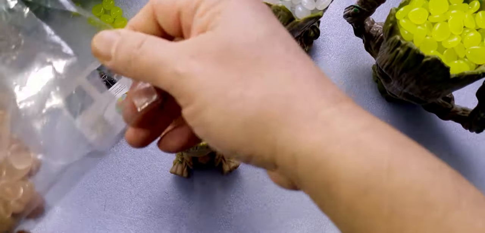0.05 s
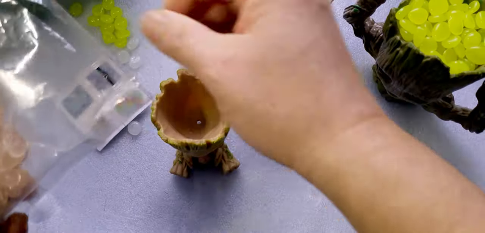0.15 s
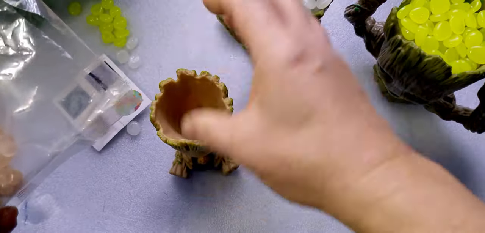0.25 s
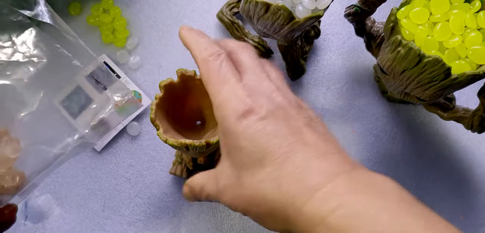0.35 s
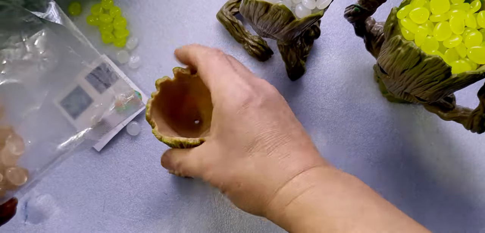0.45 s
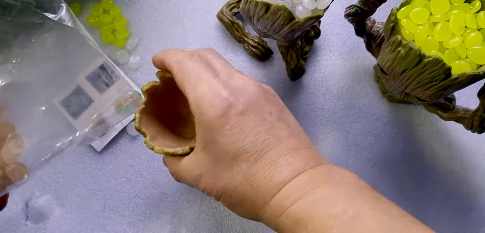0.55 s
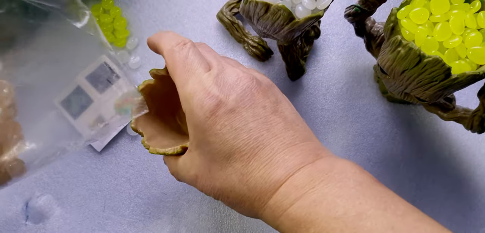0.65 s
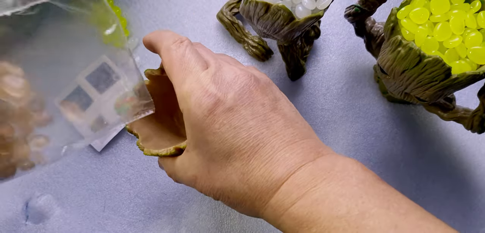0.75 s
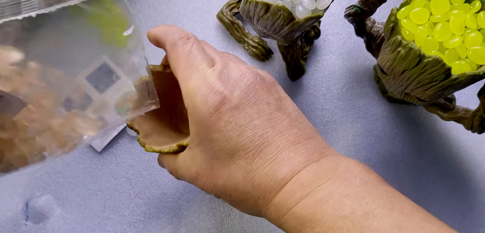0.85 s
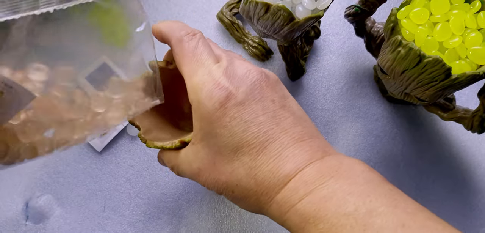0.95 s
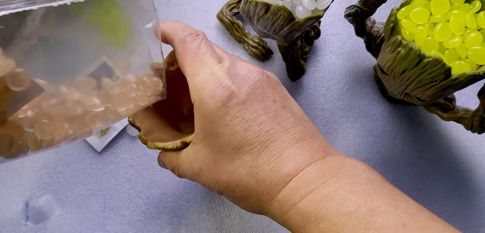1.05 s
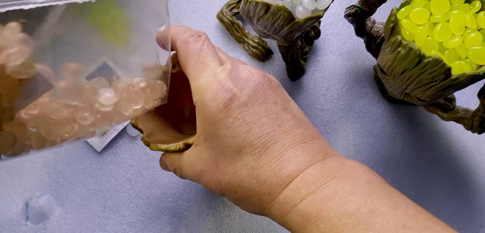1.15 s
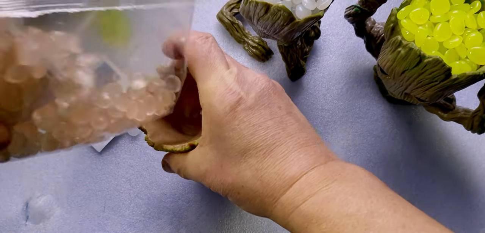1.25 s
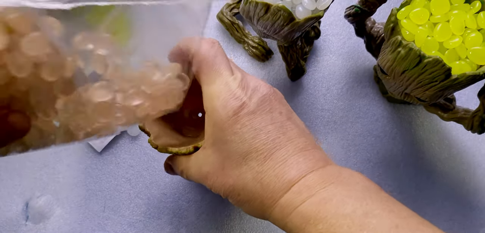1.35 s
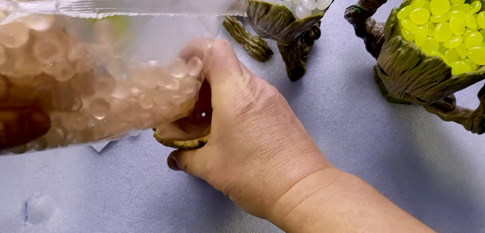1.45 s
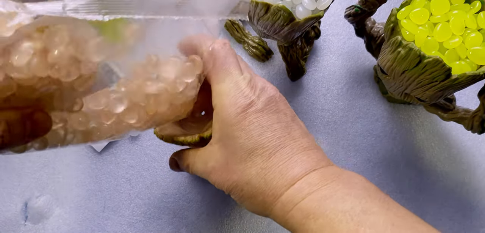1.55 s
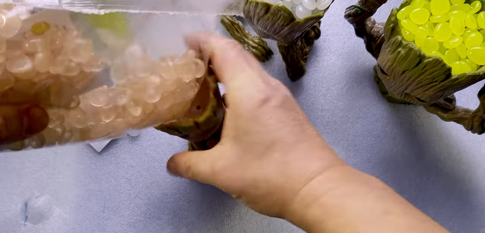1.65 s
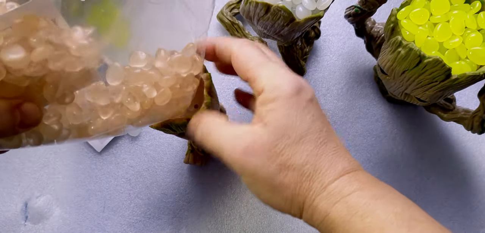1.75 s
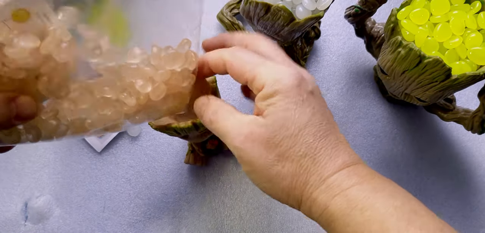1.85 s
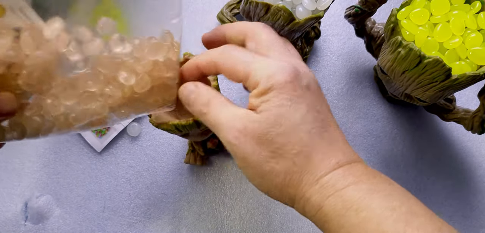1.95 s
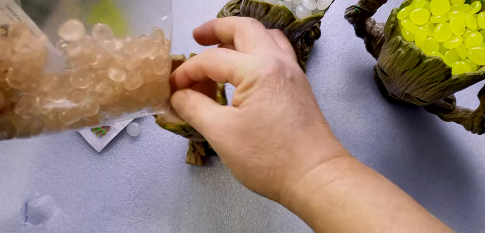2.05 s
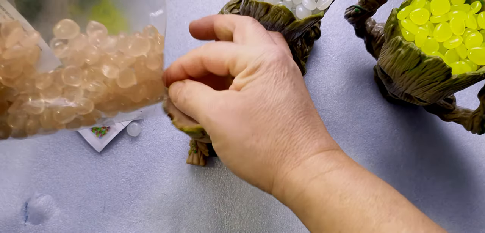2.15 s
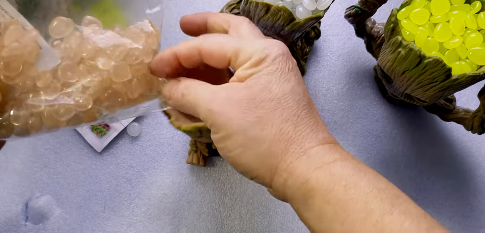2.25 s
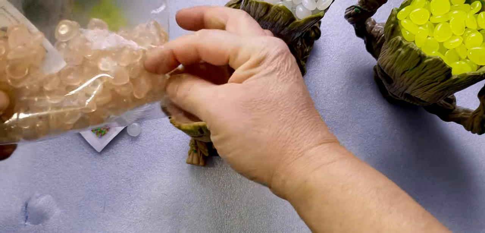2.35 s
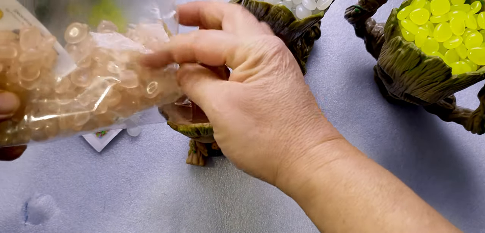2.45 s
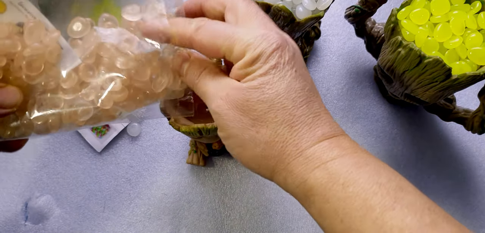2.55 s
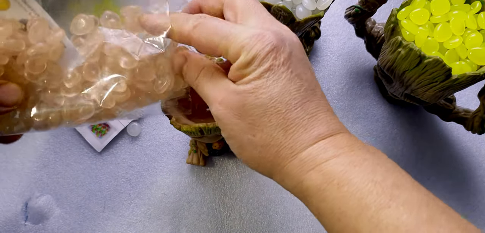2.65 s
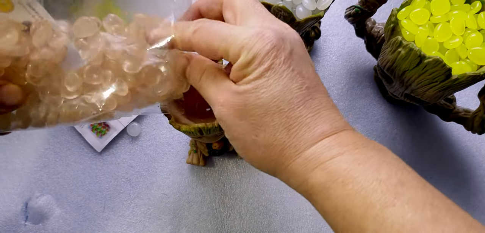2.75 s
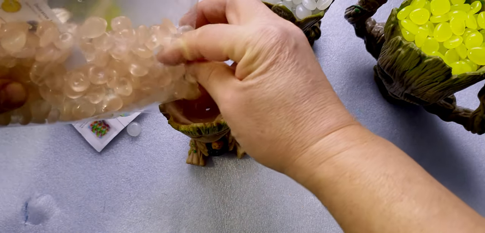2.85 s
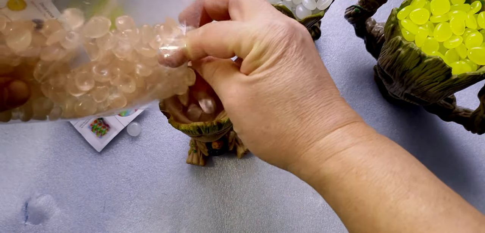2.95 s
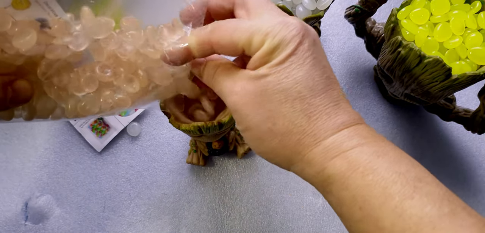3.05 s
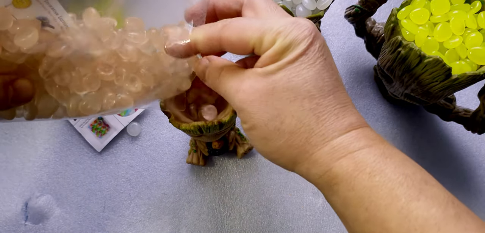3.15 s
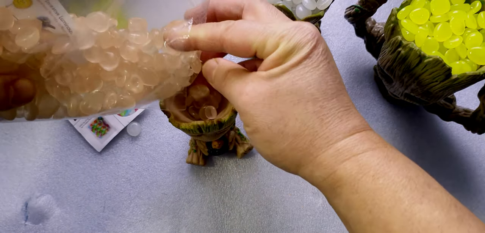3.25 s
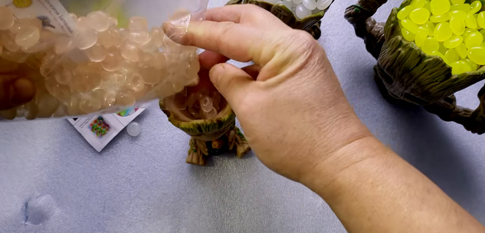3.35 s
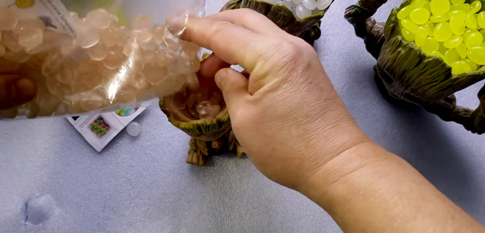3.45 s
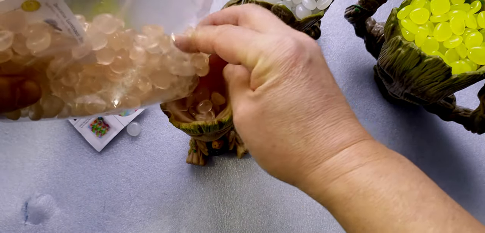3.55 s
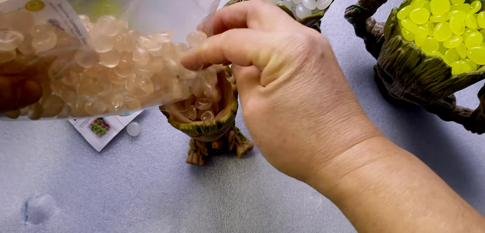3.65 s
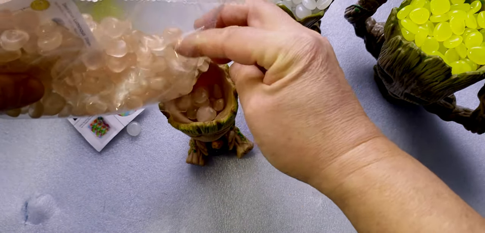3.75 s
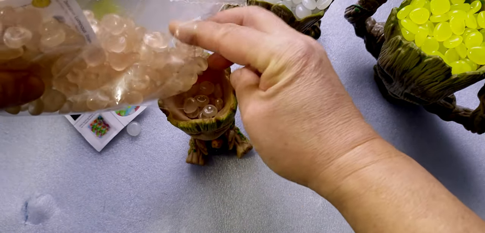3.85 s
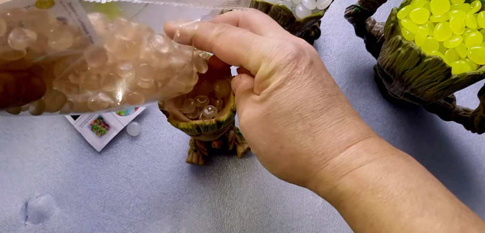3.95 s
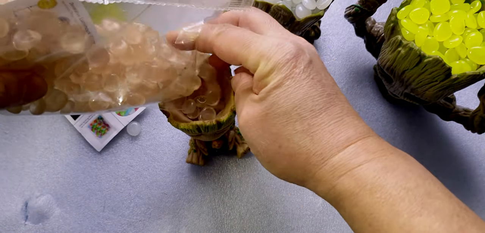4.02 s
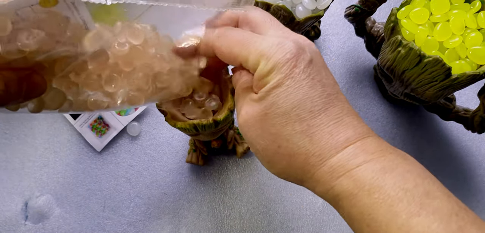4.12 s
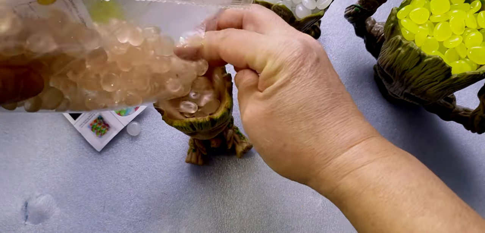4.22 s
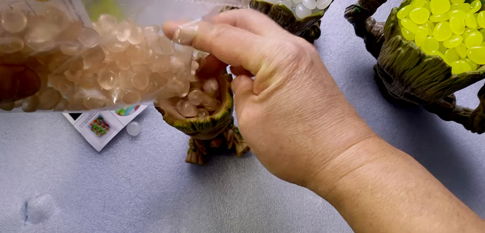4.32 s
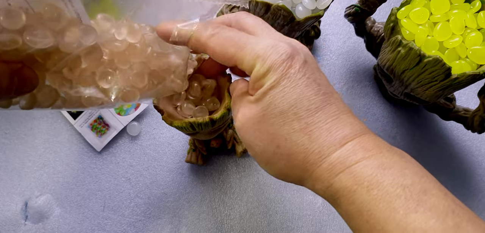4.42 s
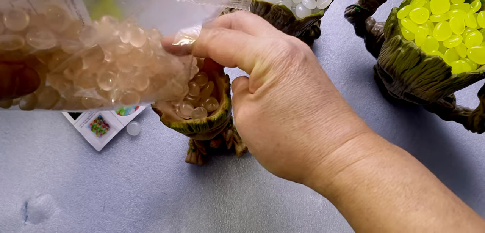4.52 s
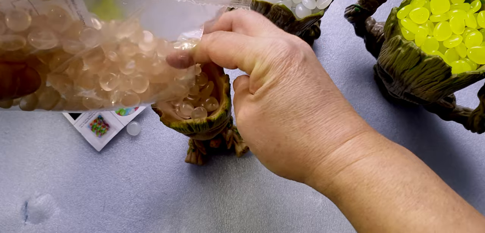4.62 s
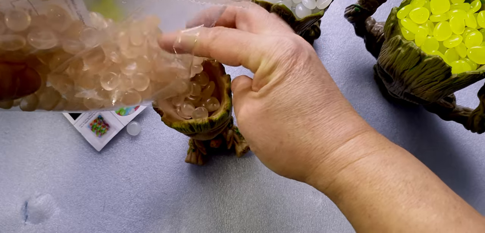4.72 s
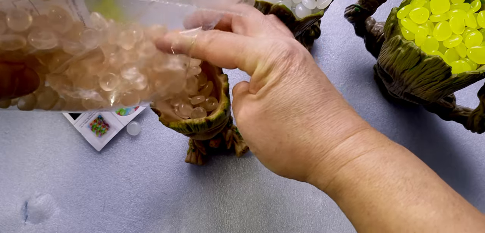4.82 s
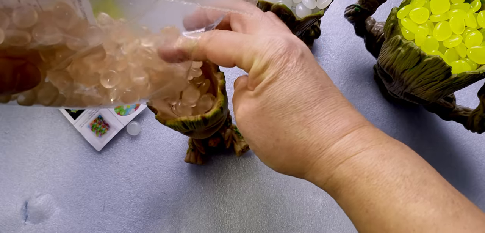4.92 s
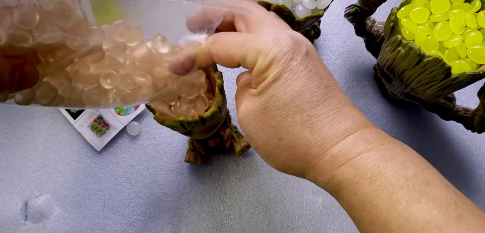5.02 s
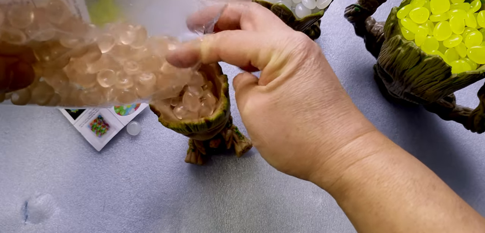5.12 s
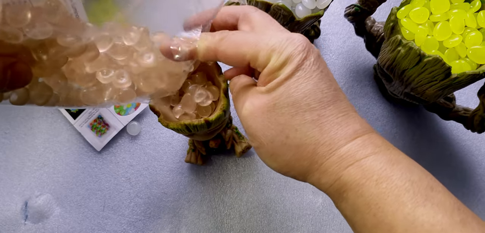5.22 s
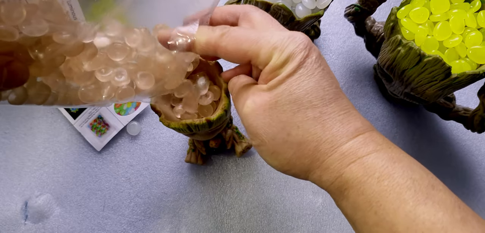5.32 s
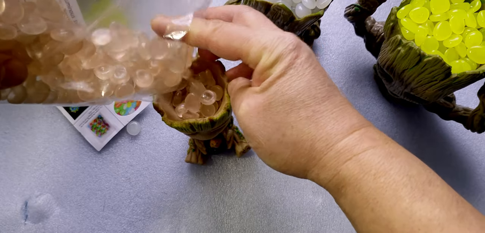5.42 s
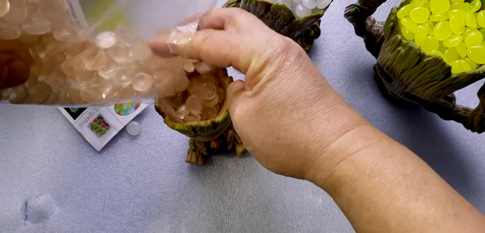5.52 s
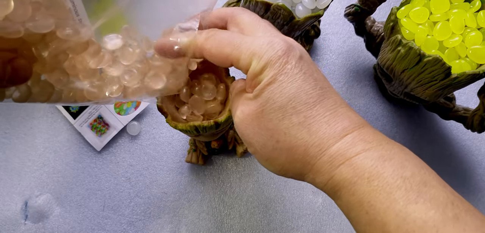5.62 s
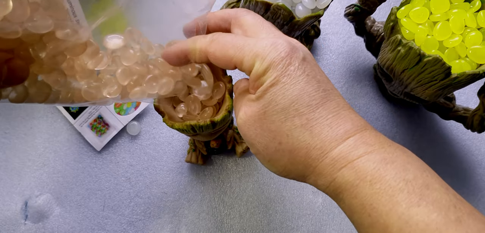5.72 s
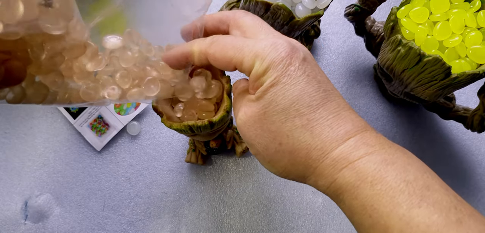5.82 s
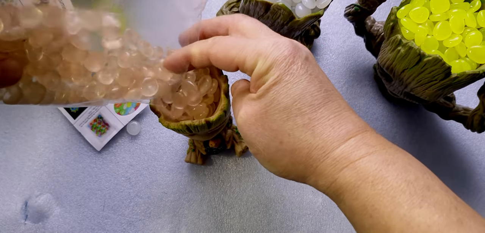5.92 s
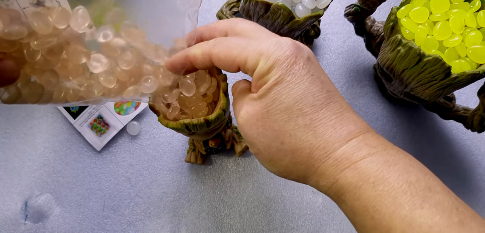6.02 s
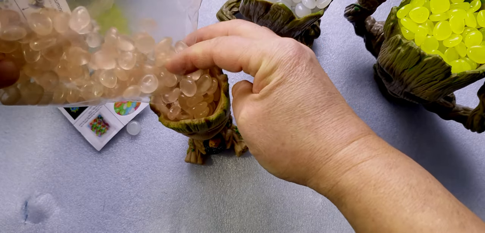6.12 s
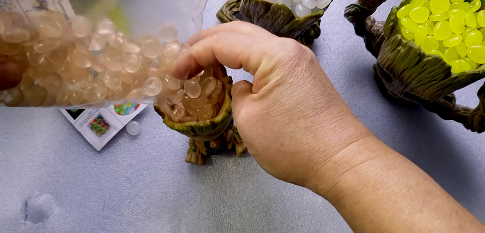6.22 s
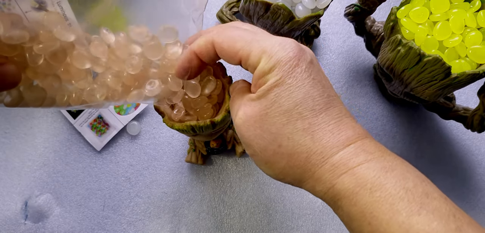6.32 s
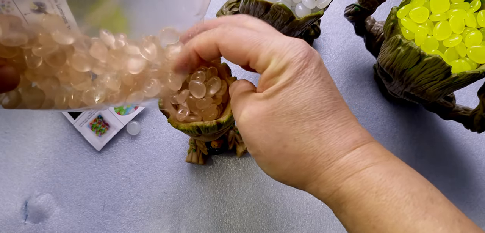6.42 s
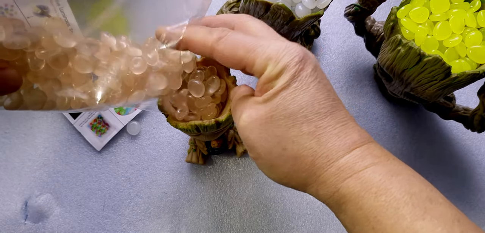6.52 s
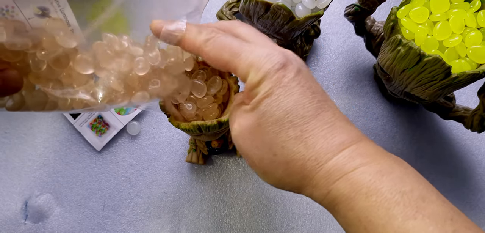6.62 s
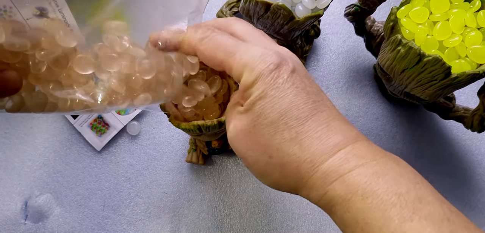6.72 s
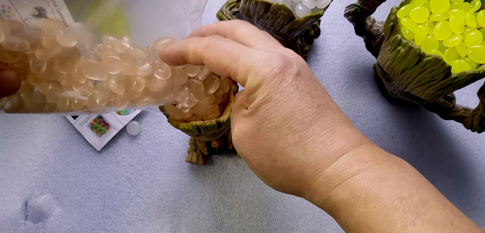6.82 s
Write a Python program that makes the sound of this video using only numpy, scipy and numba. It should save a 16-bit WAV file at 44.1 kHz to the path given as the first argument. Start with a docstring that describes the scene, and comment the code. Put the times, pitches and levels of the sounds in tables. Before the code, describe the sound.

A light crinkle and a dull thud come first. Then smooth pebbles slide inside a thin plastic bag and drop into a small pot in uneven spurts, clacking and clinking against each other. The heap shifts with dull thuds while the plastic snaps in bright crinkles. The pour thins to scattered clicks under sharp crackling, then picks up near the end. The stereo microphone is close, in a small, quiet room.

```python
"""A light crinkle and a dull thud, then smooth pebbles slide in a thin plastic bag and drop into a small pot.
The heap lurches and thuds, pebbles clack on each other and the pot, the film snaps in bright crinkles.
Each hit is a cloud of short damped grains. The pot and the desk under it ring, and the desk takes a few
low bumps. The stereo microphone is close; a small, quiet room adds a brief tail."""
import sys
import numpy as np
from scipy import signal
from scipy.fft import rfft, irfft
from scipy.io import wavfile
from numba import njit

SR = 44100
rng = np.random.default_rng(int(sys.argv[2]) if len(sys.argv) > 2 else 0)


def wav_record(signal):
    """Record a signal, one row per channel, as 16-bit PCM in the file named by sys.argv[1]."""
    frames = np.transpose(np.atleast_2d(signal))
    bounded = np.clip(frames, -1, 1)
    # unit amplitude maps onto the largest positive 16-bit level
    quanta = np.round(bounded * 32767).astype(np.int16)
    wavfile.write(sys.argv[1], SR, quanta)


N = 302967

# the heap lurches: t/s, level/dB, f/Hz, following slide/dB below level
LURCHES = [(0.12, -32, 400, 0.5), (0.1468, -11.5, 345, 38), (0.695, -21, 520, 26), (0.8005, -12.5, 440, 16),
           (0.816, -21, 390, 20), (0.898, -14.5, 455, 10), (0.92, -24, 350, 14), (0.95, -16, 407, 20),
           (0.992, -21, 480, 7), (1.05, -17.5, 330, 20), (1.097, -13.5, 410, 22), (1.132, -31, 395, 24),
           (1.227, -22, 350, 11), (1.302, -14, 294, 17), (1.332, -10, 480, 15), (1.412, -15.5, 490, 10),
           (1.512, -9, 340, 25), (1.552, -11, 460, 15), (1.6164, -11.5, 400, 12), (1.678, -17, 480, 15),
           (1.7125, -11.5, 408, 12), (1.847, -14.5, 306, 7), (1.866, -4.5, 395, 17.5), (1.955, -24, 333, 7),
           (2.015, -22, 410, 6), (2.038, -15.5, 403, 30), (2.098, -25.5, 268, 10), (2.33, -30, 302, 12),
           (2.433, -29, 304, 13), (2.47, -16, 480, 17), (2.533, -24, 410, 7), (2.645, -10, 500, 19),
           (3.076, -22, 480, 27), (3.2205, -10, 510, 28), (3.339, -26, 416, 24), (3.404, -26, 500, 20),
           (3.452, -26.5, 393, 8), (3.937, -24.5, 410, 17), (3.976, -21.5, 292, 19), (4.017, -29, 320, 21),
           (4.149, -26.5, 328, 12), (4.227, -20, 473, 23), (4.43, -32, 433, 9), (4.5885, -15.5, 354, 29),
           (4.627, -19, 378, 20), (5.03, -29, 448, 6), (5.075, -23.5, 450, 14), (5.261, -21, 377, 20),
           (5.295, -24, 400, 12), (5.421, -20.5, 287, 11.5), (5.464, -28.5, 400, 4.5),
           (5.767, -26, 580, 19), (5.869, -22, 269, 21), (5.926, -23, 519, 6), (6.027, -25, 240, 9),
           (6.24, -25, 486, 11), (6.31, -17.5, 493, 11), (6.405, -37, 330, 23), (6.4821, -10, 710, 31),
           (6.571, -18.5, 229, 11), (6.617, -16.5, 337, 16), (6.723, -27, 396, 14), (6.755, -18, 635, 20),
           (6.811, -12, 520, 22)]
# pebbles land: t/s, level/dB, f/Hz, pan/dB (left minus right), following tumble/dB below level
LANDINGS = [(0.0937, -26, 4600, 22, 18), (0.1437, -18, 1230, -1, 12.5), (0.469, -35, 4230, 23, 33),
            (0.4995, -21.5, 1110, 13, 17.5), (0.712, -23.5, 1640, 11, 12.5), (0.8028, -13.5, 1530, 8, 11.5),
            (0.855, -20, 720, 17, 23), (0.893, -1.5, 1670, 7, 19.5), (1.039, -13, 2790, 8, 23),
            (1.061, -26, 940, 7, 24), (1.294, -25.5, 1800, 0.5, 1), (1.311, -18, 1760, 2, 8),
            (1.345, -11.5, 1630, 5, 12.5), (1.371, -11.5, 2000, -1, 16), (1.447, -18.5, 950, 1, 6.5),
            (1.484, -8, 2010, -4, 19), (1.517, -11, 696, 6, 28), (1.617, -10.5, 745, 1.0, 16),
            (1.656, -3.5, 1900, 2, 25), (1.729, -7, 1080, -4, 19.5), (1.841, -23.5, 840, 2, 6),
            (1.863, -10, 690, 2, 15), (1.998, -15, 1640, 6, 29), (2.022, -7, 2090, 5, 25),
            (2.14, -14, 2470, 5, 28), (2.328, -18, 1780, 18, 13), (2.436, -14, 2200, 2.5, 29),
            (2.469, -11.5, 2140, 9, 15.5), (2.511, -15.5, 2340, 3, 20), (2.556, -12.5, 1620, -1, 24),
            (2.621, -13, 1950, 2.5, 30), (2.64, -8.5, 730, 9, 28), (2.654, -14, 2000, 1, 31),
            (2.683, -8.5, 1080, 8, 28), (2.761, -18.5, 1100, 0.5, 23), (2.797, -8.5, 1530, 2, 23),
            (2.969, -16.5, 1760, -1, 30), (3.038, -16, 1160, 8, 34), (3.078, -16, 920, 1.5, 18),
            (3.2235, -2.5, 2380, 3, 20.5), (3.2312, -14.5, 2430, 16, 26), (3.323, -17.5, 2080, 3, 30),
            (3.407, -22.5, 1020, 2, 12), (3.476, -12, 2390, 1.5, 19.5), (3.636, -20.5, 990, 2, 16),
            (3.862, -15.5, 785, -5, 11), (3.91, -12.5, 2700, -3, 35), (3.9403, -11, 1450, -1, 32),
            (4.008, -23, 2010, -3, 8), (4.321, -18.5, 2920, -8, 15), (4.434, -27, 3440, 6, 23),
            (4.455, -18, 1310, 1.0, 19), (4.511, -9.5, 2490, -2, 41), (4.538, -12, 2540, -1, 43),
            (4.892, -19.5, 2390, -1, 25), (5.007, -18, 3300, 9, 13), (5.462, -18.5, 1020, 0, 11),
            (5.714, -23, 2100, 1.5, 29), (5.77, -18, 650, 2, 24), (5.828, -18, 1760, 0, 15.5),
            (5.899, -19, 2370, 0, 7), (5.928, -19.5, 836, 7, 6.5), (5.965, -15, 960, 9, 13.5),
            (6.244, -18.5, 760, 0, 31), (6.405, -17.5, 705, 2, 33), (6.447, -20.5, 955, 2.5, 25),
            (6.4849, -6.5, 1310, 3, 17), (6.4898, -11, 2080, -6, 26), (6.5069, -9, 3380, 2.0, 31),
            (6.5754, -9.5, 2500, 1, 19), (6.61, -16, 970, -2, 13), (6.663, -11, 936, 3, 17.5),
            (6.685, -11, 1120, 1.0, 31), (6.757, -13, 1080, 7, 15)]
# the film snaps: t/s, level/dB, lower treble/dB re level, pan/dB, following rustle/dB below level
FILM_SNAPS = [(0.0923, -30.5, -1.5, 10, 17), (0.1106, -30, -6, 4, -2.5), (0.4686, -43.5, 0, 1, 13),
              (0.4988, -30.5, -1, 1, 26), (0.6065, -40, -20, 13, 22), (0.7117, -30.5, 0, 11, 9),
              (0.7412, -36, 4, 4, 28), (0.803, -32, 6, 9, 10), (0.8929, -16, 4.5, 8, 14.5),
              (0.9443, -21.5, -11, 0, 5.5), (0.967, -23.5, -8, 7, 15), (0.9906, -24, -10, 4, 10),
              (1.036, -29, 2, 11, 26), (1.1705, -24, -6, 3.0, 13), (1.1994, -21, -20, 4, 23),
              (1.2239, -13, -23, 4, 29), (1.329, -19.5, -6, 6, 4.5), (1.3715, -19, -8, 6, 18),
              (1.4254, -25, -7, 7, 2), (1.483, -26, 1, 10, 27), (1.548, -15.5, -23, 11, 14),
              (1.613, -18, -19, 7, 15), (1.658, -15.5, -2, 10, 18), (1.686, -19, -23, 5, 18),
              (1.7156, -17.5, -17, 4, 12), (1.728, -8.5, -5, 4, 27), (1.839, -30, -12, 2.0, 18),
              (1.8602, -20, -18, 2, 14), (1.893, -22, -16, 2.0, 14), (2.023, -15.5, -3.5, 5, 26),
              (2.04, -20, -4.5, 2, 24), (2.141, -21.5, -4, 7, 16), (2.1939, -30.5, 9, 4, 14),
              (2.475, -15.5, -6.5, -0.5, 23), (2.5555, -16, -9, 1, 30), (2.619, -15.5, -13, 4, 27),
              (2.685, -10, -5, 6, 39), (2.846, -22, -22, 12, 15), (2.96, -17, -23, 10, 5),
              (2.966, -23, -22, 4, 18), (3.0002, -7, -23, 4, 17.5), (3.008, -17, -20, 3, 20),
              (3.028, -15.5, -19, 13, 18), (3.042, -19, -18, 3, 10), (3.0926, -7, -24, -3, 11),
              (3.0996, -11, -25, -1, 17), (3.116, -14, -30, 1, 8.5), (3.134, -9, -28, 2, 23),
              (3.172, -14.5, -20, 0, 8), (3.224, -7, -14.5, 1, 17.5), (3.2907, -20.5, -20, 2.0, 16),
              (3.332, -8.5, -27, 4, 17), (3.348, -23, -18, 2, 29), (3.387, -22.5, -24, 2, 26),
              (3.4426, -27, -12, 2, 22), (3.462, -7, -20, 4, 21), (3.467, -16, -20, 1.5, 33),
              (3.48, -19, -3.5, -2, 29), (3.497, -26, 0, 5, 25), (3.5453, -2, -28, -2, 34),
              (3.596, -16.5, -20, -2, 22), (3.714, -9, -13, 3, 21), (3.723, -12, -26, 8, 28),
              (3.738, -10, -19, 3, 12), (3.7563, -10, -35, -5, 31), (3.7741, -11, -12, 1, 14),
              (3.777, -14, -19, -8, 25), (3.8526, -17, -16, -2, 17), (3.8682, -24.5, 1, -2, 29),
              (3.9412, -22, -2.5, 1, 34), (3.976, -25, -1, 4, 21), (4.0064, -12.5, -11.5, 2, 19),
              (4.0705, -17, -16, 1.0, 15.5), (4.102, -19, -28, 5, 17), (4.117, -6, -26, 2, 20.5),
              (4.15, -23, -1, -10, 31), (4.187, -20, -14, 3, 26), (4.1979, -11, -31, 7, 15),
              (4.2034, -13, -29, 6, 24), (4.21, -10.5, -16, -2, 17), (4.251, -24, -15, 6, 18),
              (4.2776, -16, -17, -3, 13), (4.293, -18, -16, -3, 16), (4.307, -19, -13, 8, 10),
              (4.3167, -13.5, -7, -1, 19), (4.3289, -15, -21, 1, 26), (4.3355, -16, -18, -3, 26),
              (4.358, -13.5, -32, 5, 12.5), (4.426, -16, -10, -2, 16), (4.434, -12.5, -14.5, 4, 23),
              (4.5092, -21, -16, 6, 38), (4.537, -12.5, -10, 2, 34), (4.591, -20.5, -11, 4, 31),
              (4.627, -24, -7, 2, 14), (4.808, -3.5, -20, 2, 25), (4.8852, -17, -21, 0, 28),
              (4.893, -11, -14, 5, 20), (4.9046, -14, -16, 4, 18), (4.9283, -11, -26, -3, 16.5),
              (4.9338, -17, -10, 7, 27), (4.965, -20, -15, 2, 30), (5.008, -10, -18, 2, 18),
              (5.0164, -22, -18, 1, 24), (5.0704, -24, -13, -1, 5), (5.0898, -14, -11, -3, 8.5),
              (5.1067, -15, -9, 1, 10.5), (5.15, -16.5, -23, 4, 16), (5.191, -23, -23, -6, 18),
              (5.207, -22.5, -10, 5, 7), (5.233, -24, -16, 3, 22), (5.2883, -20, -13, 7, 35),
              (5.3198, -20, -20, 1.5, 13.5), (5.3545, -26, -15, 4, 27), (5.381, -15.5, -10, -6, 15),
              (5.3883, -16.5, -10.5, 6, 24), (5.463, -9.5, -18.5, 8, 23), (5.496, -19.5, -9, 2, 12.5),
              (5.549, -14, -9, 1, 27), (5.5802, -19, -11, -2, 12.5), (5.6009, -7.5, -17, 6, 29),
              (5.6158, -18, -8, 6, 19), (5.644, -17, -11.5, 5, 17), (5.666, -16.5, -11, 4, 29),
              (5.715, -15, -14, -1, 19), (5.7295, -15, -26, 1, 32), (5.7516, -22, -22, 0.0, 22),
              (5.7668, -19, -15, 4, 9), (5.8094, -22.5, -11, 5, 4), (5.8438, -14, -20, 1, 17),
              (5.864, -18, -14, 0, 10), (5.931, -16, -16, 6, 22), (5.991, -22, -18, 7, 25),
              (6.0112, -22, -19, 4, 30), (6.041, -21, -12, 4, 10.5), (6.1015, -15.5, -19, 4, 20),
              (6.179, -23, -15.5, 5, 12), (6.244, -23, -31, 2, 33), (6.3438, -22, -11, 9, 17),
              (6.4476, -29, -7, 13, 14), (6.4847, -18, 3, 11, 15), (6.572, -30, -1, 0, 6),
              (6.6094, -20, -8, 7, 21), (6.663, -20.5, -12, 7, 28), (6.687, -7, -19, 4, 24),
              (6.729, -20, -24, 1.0, 25), (6.7563, -19.5, -30, 2, 12), (6.769, -19, -20, 2, 26),
              (6.841, -22.5, -7, 6, 11)]
# the desk is bumped: t/s, level/dB, f/Hz
DESK_BUMPS = [(0.141, -23, 76.4), (1.316, -36, 75.4), (1.554, -38, 99.6), (2.055, -45, 86.1),
              (2.324, -42, 98), (2.5, -38, 88.8), (2.708, -37, 64.6), (3.208, -41, 40.4), (5.437, -41, 98),
              (6.608, -42, 99.6)]
# how hard the heap slides between lurches: t/s, dull shifting/dB, pebble rattle/dB
SLIDING = [(0.0, -38, -42.5), (0.09, -75, -45.5), (0.27, -71, -52.5), (0.52, -50.5, -55),
           (0.65, -44.5, -44), (0.76, -35.5, -37), (0.88, -24.5, -30.5), (0.97, -27, -25),
           (1.08, -30.5, -32), (1.3, -32.5, -34.5), (1.53, -26, -30), (1.76, -32.5, -32.5),
           (1.89, -31.5, -36.5), (2.14, -41.5, -38.5), (2.33, -41, -37.5), (2.6, -35, -36),
           (2.93, -41.5, -36.5), (3.5, -44, -42.5), (3.9, -43.5, -38), (4.13, -48.5, -42), (4.71, -39, -38),
           (5.74, -47.5, -39), (5.95, -34.5, -39), (6.08, -35.5, -33), (6.31, -45, -39), (6.68, -48, -36.5),
           (6.87, -37, -35)]
# how hard the film is handled between snaps: t/s, fine creases/dB, large folds/dB
HANDLING = [(0.0, -46, -42.5), (0.09, -65, -68), (0.27, -67, -83), (0.46, -81, -75), (0.8, -42, -46),
            (0.96, -34.5, -39), (1.2, -39, -45.5), (1.57, -32.5, -38.5), (1.7, -33.5, -41),
            (2.16, -53, -53.5), (2.33, -43, -43), (2.56, -45.5, -45.5), (2.93, -41.5, -42),
            (3.16, -41, -62), (3.29, -50, -71), (3.48, -44, -52.5), (4.06, -53, -50.5), (4.25, -36, -40),
            (4.63, -49.5, -57), (4.88, -48, -51), (5.01, -53, -44), (5.39, -48, -52), (5.76, -43, -44),
            (5.95, -36, -42.5), (6.1, -45, -72), (6.33, -49, -52), (6.66, -44.5, -45), (6.87, -33, -43)]
# bag and heap stick and fall quiet until they let go: release t/s, length/s, depth/dB
STICKING = [(0.468, 0.23, 16), (0.714, 0.08, 3.5), (1.837, 0.14, 4.5), (2.189, 0.053, 7.5),
            (2.306, 0.083, 7), (2.414, 0.051, 8), (2.966, 0.1, 9), (3.319, 0.038, 8), (3.449, 0.15, 6),
            (3.541, 0.031, 6), (3.7, 0.05, 8), (3.831, 0.045, 6.5), (3.933, 0.014, 7), (4.072, 0.034, 5),
            (4.434, 0.057, 4), (4.504, 0.045, 12), (4.815, 0.23, 4), (4.884, 0.032, 8), (5.013, 0.13, 4.5),
            (5.196, 0.11, 6), (5.265, 0.026, 5.5), (5.404, 0.088, 4), (6.235, 0.14, 8), (6.399, .05, 8),
            (6.552, 0.03, 1)]
# resonances of desk and pot: f/Hz, level/dB
BODY_MODES = [(319, -9.5), (409, -10.5), (486, -6.5), (694, -14.5), (840, -21.5), (948, -7), (1635, -13),
              (1820, -10.5), (2072, -7.5), (2372, -8)]
# spectrum of the room tone: f/Hz, density/dB
ROOM_TONE = [(18, -38), (30, -1), (296, -3), (497, -5), (4200, -35), (7060, -33), (15000, -25)]

HEAP_HZ, PEBBLE_HZ, POT_HZ, FILM_HZ, FOLD_HZ = 421.5, 1385, 2180, 12520, 4980  # grain centre pitches
GLASSY_HZ = 3890  # a smooth pebble's own ring


def pebbles(shake):
    """Pebbles knock on each other and the pot, bounce and ring like glass; sliding, they rush densely."""
    t, db, hz, pan_db, tumble_db = np.transpose(LANDINGS)
    knocks = grains(t, db - 14, hz, pan_db, lag=1, octaves=0.2, cycles=0.98, spread_s=0.0028, count=2)
    cracks = grains(t, db - 20, POT_HZ, pan_db, lag=0.7, octaves=0.66, cycles=0.45,
                    spread_s=0.00356, count=8)
    ticks = grains(t, db - 13, POT_HZ, pan_db, lag=0.27, octaves=0.87, cycles=0.27,
                   spread_s=0.00077, count=7)
    clinks = grains(t, db - 14.5, hz, pan_db, lag=2.3, octaves=0.033, cycles=2.03,
                    spread_s=0.00198, count=2)
    chimes = grains(t, db - 18, GLASSY_HZ, pan_db, lag=0.73, octaves=0.217, cycles=2.16,
                    spread_s=0.00048, count=2)
    dip = dip_before_hits(LANDINGS, dip_s=0.012)
    tumble = motion(SLIDING, 2, t, db - tumble_db, rise_s=0.0017, fall_s=0.013)
    rattle = grain_bed(tumble, 2.16 * shake - 4.3 * dip, PEBBLE_HZ, octaves=0.742, cycles=0.48,
                       scatter_db=-0.2, lag=4.7, trim_db=-1.5, count=12000)
    clatter = grain_bed(tumble, 3.6 * shake - 2.1 * dip, POT_HZ, octaves=0.26, cycles=0.8,
                        scatter_db=-2.5, lag=3.1, trim_db=-4.5, count=10000)
    rush = grain_bed(tumble, 1.6 * shake - 6 * dip, GLASSY_HZ, octaves=0.36, cycles=0.87,
                     scatter_db=-1.5, lag=3.4, trim_db=-12.5, count=30000, pan_db=17)
    return knocks + cracks + ticks + clinks + chimes + rattle + clatter + rush


def heap(shake):
    """The pebble heap shifts in the bag: dull thuds of about one cycle over a low shuffle."""
    t, db, hz, slide_db = np.transpose(LURCHES)
    thud_delay_s = 0.00316  # each dull thud sounds 3 ms after its listed time
    thuds = grains(t + thud_delay_s, db - 3.5, hz, pan_db=0, lag=0.93, octaves=0.12, cycles=0.46,
                   spread_s=0.0069, count=2)
    slide = motion(SLIDING, 1, t, db - slide_db, rise_s=0.00099, fall_s=0.03)
    shuffle = grain_bed(slide, 1.25 * shake, HEAP_HZ, octaves=0.57, cycles=0.63,
                        scatter_db=1.5, lag=2.1, trim_db=-1.5, count=5000, pan_db=-0.3)
    return low_cut(thuds + shuffle, hz=112)  # the heap sounds little below about 110 Hz


def film(shake):
    """The plastic film snaps and fizzes on as creases run; larger folds sound lower."""
    t, db, fold_db, pan_db, rustle_db = np.transpose(FILM_SNAPS)
    snaps = grains(t, db - 1, FILM_HZ, pan_db, lag=1.1, octaves=0.24, cycles=0.98,
                   spread_s=0.0021, count=16, lead=4.3)
    fizz = grains(t, db - rustle_db + 4, FILM_HZ, pan_db, lag=1.4, octaves=0.5, cycles=0.31,
                  spread_s=0.031, count=90, lead=6.4)
    folds = grains(t, db + fold_db + 2.5, FOLD_HZ, pan_db, lag=5.4, octaves=0.48, cycles=0.58,
                   spread_s=0.0035, count=12, lead=1.2)
    dip = dip_before_hits(FILM_SNAPS, dip_s=0.0048)
    creasing = motion(HANDLING, 1, t, db - rustle_db, rise_s=0.00087, fall_s=0.015)
    crackle = grain_bed(creasing, -6.5 * dip, FILM_HZ, octaves=0.388, cycles=3.1,
                        scatter_db=7, lag=1.1, trim_db=-10.5, count=900, lead=1.6)
    rustle = grain_bed(creasing, 2.27 * shake - 1.6 * dip, FILM_HZ, octaves=0.19, cycles=0.81,
                       scatter_db=1, lag=1, trim_db=3, count=50000, lead=1.8)
    folding = motion(HANDLING, 2, t, db + 0.45 * fold_db - rustle_db - 5.5, rise_s=0.003, fall_s=0.025)
    crumple = grain_bed(folding, 2.74 * shake - 1.8 * dip, FOLD_HZ, octaves=0.553, cycles=0.63,
                        scatter_db=-0.5, lag=3, trim_db=5.5, count=25000, lead=2.9)
    return snaps + fizz + folds + crackle + rustle + crumple


def slips(per_s=70, fall_s=0.0073):
    """Small slips shake heap and film alike: a modulator around zero with sudden rises and quick falls."""
    kicks = (rng.random(N) < per_s / SR) * rng.exponential(size=N)
    shake = np.sqrt(decay(kicks, fall_s) + 0.011)
    return np.minimum((shake - shake.mean()) / shake.std(), 1.8)


def dip_before_hits(events, dip_s):
    """Ducks rattle and rustle just before each hit: jumps to 1 dip_s ahead, falls to 0 at the hit."""
    marks = np.zeros(N)
    marks[(np.array(events)[:, 0] * SR).astype(int)] = 1
    ramp = np.linspace(0, 1, int(dip_s * SR) + 2)
    return np.minimum(signal.correlate(marks, ramp, "full")[len(ramp) - 1:], 1)


def motion(curve, column, t, db, rise_s, fall_s):
    """Envelope of the movement: a slow level ride plus a swell around each hit, ducked where it sticks."""
    curve = np.array(curve)
    ride = undb(np.interp(np.arange(N) / SR, curve[:, 0], curve[:, column])) ** 2
    kicks = np.zeros(N)
    np.add.at(kicks, (t * SR).astype(int), undb(db) ** 2)
    build_up = decay(kicks[::-1], rise_s)[::-1]
    return np.sqrt(ride + decay(kicks, fall_s) + build_up) * sticking()


def sticking():
    """Bag and heap catch: the gain sinks, stays down and is back at once on release."""
    release, length, depth_db = np.array(STICKING).T[:, :, None]
    remaining = (release - np.arange(0, N, 32) / SR) / np.abs(length)
    dip_db = np.sum(depth_db * np.clip(2 * (1 - remaining), 0, 1) * (remaining > 0), axis=0)
    return np.repeat(undb(-dip_db), 32)[:N]


def grains(t, db, hz, pan_db, lag, octaves, cycles, spread_s=0, count=1, lead=0):
    """Each hit is a cluster of grains, later ones weaker, with an attack about `cycles` periods long.
    Pitch scatters by `octaves`, stereo delay by `lag` samples; the left side is `lead` samples early."""
    t, db, hz, pan_db = (np.repeat(np.broadcast_to(v, np.shape(t)), count) for v in (t, db, hz, pan_db))
    late, turn = rng.random((len(t), 2)).T
    pitch, place, length = rng.standard_normal((len(t), 3)).T
    late = late * (np.arange(len(t)) % count > 0)  # the first grain lands on the hit
    hz = np.clip(hz * 2 ** (octaves * pitch), 30, 0.4 * SR)
    attack = cycles * SR / hz * 1.42 ** np.clip(length, -1.5, 1.1)
    side = np.array([[0.5], [-0.5]])
    start = np.maximum((t + spread_s * late) * SR + side * (lag * place - lead), 0)
    gain = undb(db - 13.1 * late + side * (pan_db + 1.82 * lag * place))
    return damped_sines(np.round(start).astype(np.int64), hz, attack, 2 * np.pi * turn, gain)


def grain_bed(envelope, accent_db, hz, octaves, cycles, scatter_db, lag, trim_db, count,
              lead=0, pan_db=2.15):
    """Many tiny contacts at random times blend into a texture that follows the envelope."""
    t = np.sort(rng.random(count)) * N / SR
    db = scatter_db * np.minimum(rng.exponential(size=count), 5.5) + accent_db[(t * SR).astype(int)]
    bed = grains(t, db, hz, pan_db, lag, octaves, cycles, lead=lead)
    return bed * envelope * undb(trim_db) / np.sqrt(np.mean(bed ** 2))


@njit
def damped_sines(start, hz, attack, phase, gain):
    """Stereo mix of sine grains that swell for `attack` samples to about their gain, then die away."""
    out = np.zeros((2, N))
    for g in range(len(hz)):
        step = np.exp(2j * np.pi * hz[g] / SR - 1 / attack[g])
        swing = np.exp(1j * phase[g]) * np.e / attack[g]
        for i in range(min(int(7 * attack[g]) + 2, N - max(start[0, g], start[1, g]))):
            out[0, start[0, g] + i] += gain[0, g] * i * swing.imag
            out[1, start[1, g] + i] += gain[1, g] * i * swing.imag
            swing *= step
    return out


def body_ring(strikes, ring_cycles=15, ring_s=0.025):
    """Desk top and pot ring under the stones; each mode falls 60 dB in ring_cycles plus ring_s."""
    ring = 0
    for hz, db in BODY_MODES:
        radius = np.exp(-np.log(1000) / ((ring_cycles / hz + ring_s) * SR))
        feedback = [1, -2 * radius * np.cos(2 * np.pi * hz / SR), radius ** 2]
        ring = ring + undb(db) * signal.lfilter([1 - radius, 0, radius - 1], feedback, strikes)
    return ring


def desk_bumps():
    """Low bumps come through the desk top, one grain each."""
    t, db, hz = np.transpose(DESK_BUMPS)
    return grains(t + 0.003, db - 0.5, hz, pan_db=5.4, lag=1.5, octaves=0.29, cycles=0.37)


def room_tail(close, t60_s=0.18, wet_db=-12.5, band_hz=(720, 8360)):
    """Dense reflections from desk and walls, different on each side, weak in bass and top."""
    t = np.arange(SR // 4) / SR
    tail = rng.standard_normal((2, len(t))) * undb(-60 * t / t60_s) * (t > 0.002)
    tail = signal.lfilter(*signal.butter(1, band_hz, "band", fs=SR), tail)
    tail = tail * undb(wet_db) / np.sqrt(np.sum(tail ** 2, axis=1, keepdims=True))
    return signal.oaconvolve(close.mean(axis=0, keepdims=True), tail, axes=1)[:, :N]


def room_tone(level_db=-66):
    """The quiet room: a steady, dark noise floor."""
    hz, db = np.transpose(ROOM_TONE)
    bins_hz = np.maximum(np.arange(N // 2 + 1) * SR / N, 1)
    colour = undb(np.interp(np.log(bins_hz), np.log(hz), db))
    noise = irfft(rfft(rng.standard_normal((2, N))) * colour, N)
    return noise * undb(level_db) / np.sqrt(np.mean(noise ** 2))


def undb(db):
    """Decibels to gain."""
    return 10 ** (np.asarray(db) / 20)


def decay(kicks, fall_s):
    """Gives every kick an exponential release."""
    return signal.lfilter([1], [1, -np.exp(-1 / (fall_s * SR))], kicks)


def low_cut(x, hz):
    """Rolls off the bass at 12 dB an octave."""
    return signal.lfilter(*signal.butter(2, hz, "high", fs=SR), x)


def scene():
    """Pebbles, bag and ringing pot up front; desk bumps and the room behind."""
    shake = slips()
    stones = heap(shake) + pebbles(shake)
    close = undb(-1) * stones + body_ring(stones) + film(shake)
    return close + room_tail(close) + desk_bumps() + room_tone()


def record(dry):
    """The microphone loses the deep bass; the recorder rounds the loudest peaks and cuts the top."""
    rounded = np.tanh(1.088 * low_cut(dry, hz=49)) / 1.242
    top_hz = 15900
    return signal.sosfilt(signal.ellip(10, 0.2, 75, top_hz, fs=SR, output="sos"), rounded)


dry = scene()
out = record(dry)
wav_record(out)
```